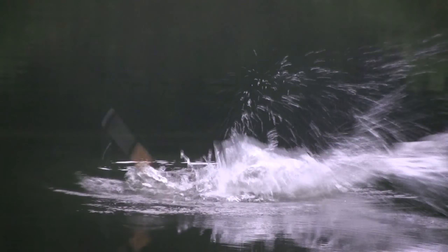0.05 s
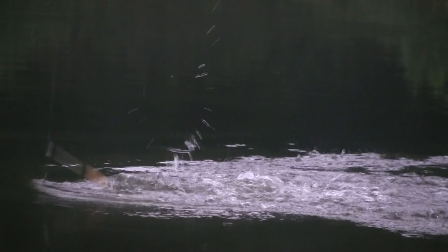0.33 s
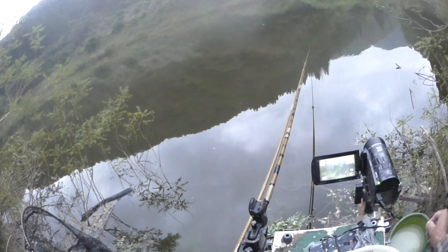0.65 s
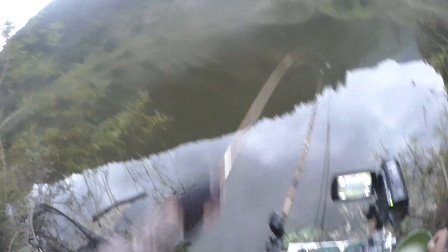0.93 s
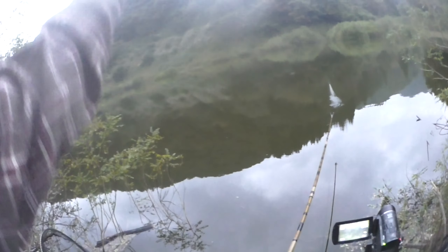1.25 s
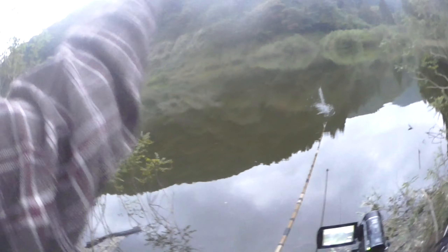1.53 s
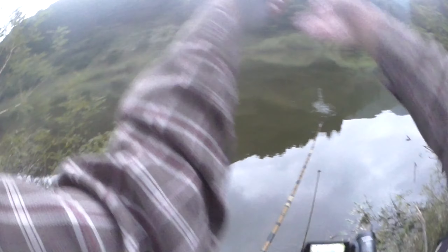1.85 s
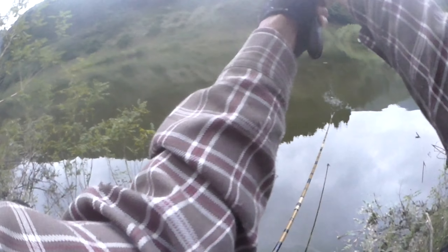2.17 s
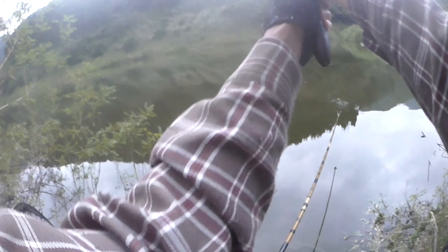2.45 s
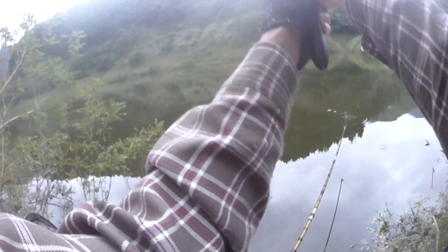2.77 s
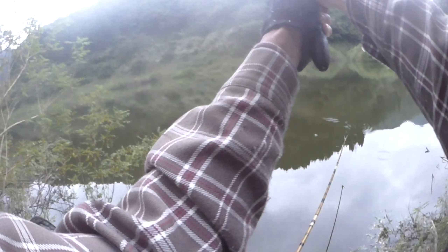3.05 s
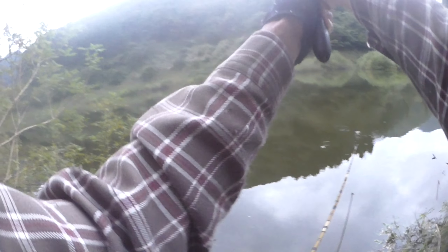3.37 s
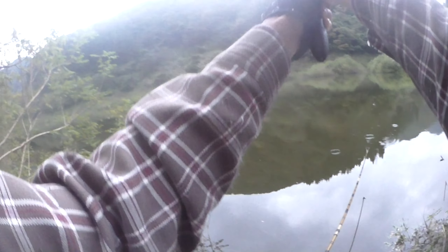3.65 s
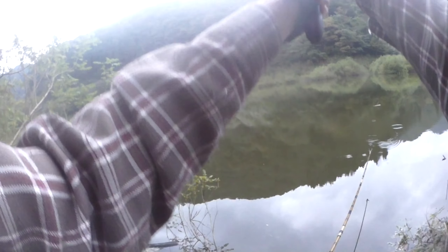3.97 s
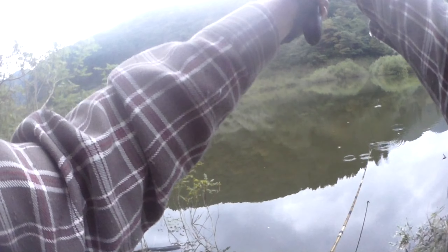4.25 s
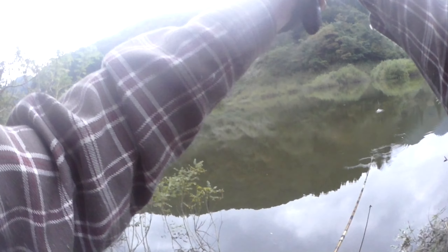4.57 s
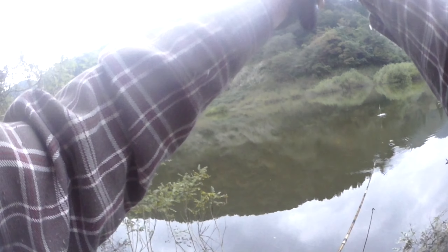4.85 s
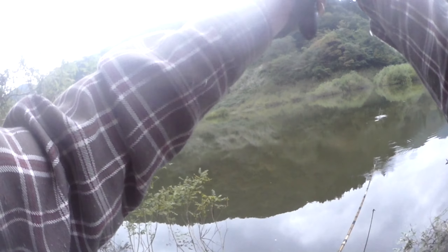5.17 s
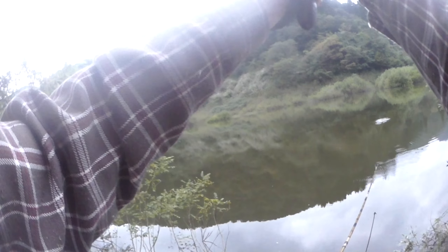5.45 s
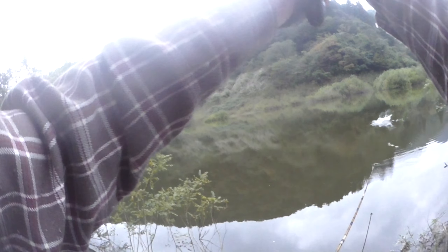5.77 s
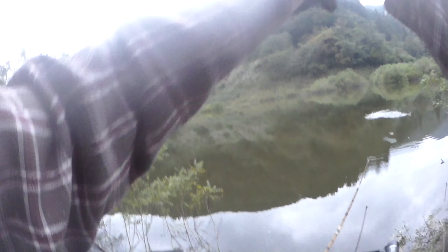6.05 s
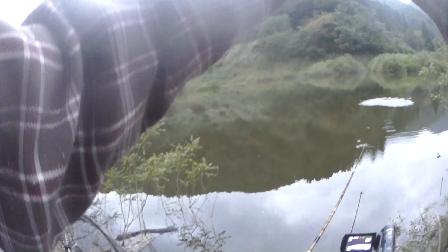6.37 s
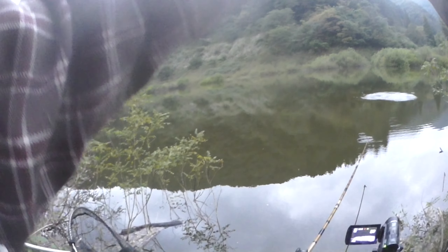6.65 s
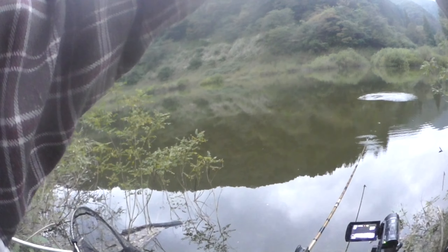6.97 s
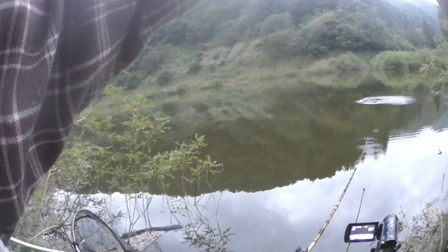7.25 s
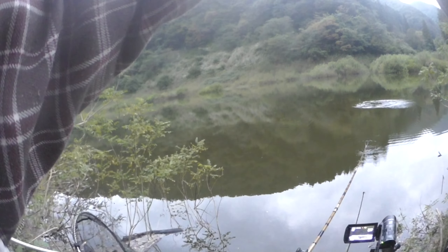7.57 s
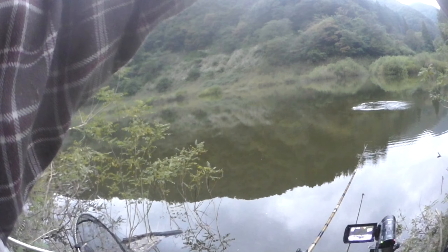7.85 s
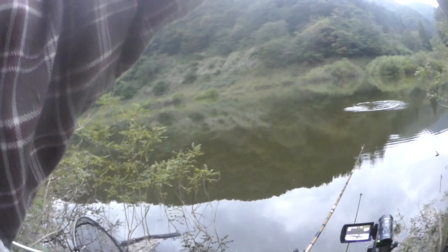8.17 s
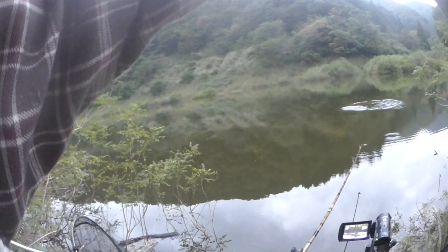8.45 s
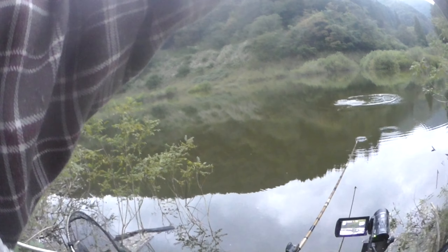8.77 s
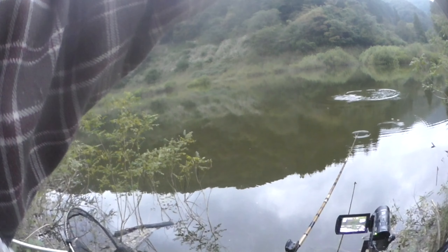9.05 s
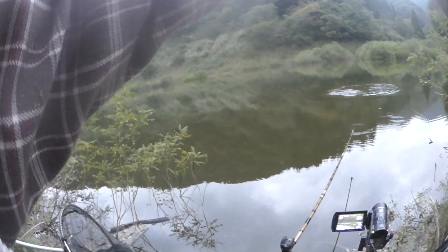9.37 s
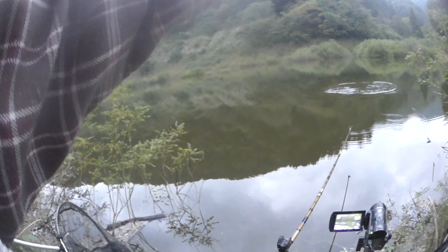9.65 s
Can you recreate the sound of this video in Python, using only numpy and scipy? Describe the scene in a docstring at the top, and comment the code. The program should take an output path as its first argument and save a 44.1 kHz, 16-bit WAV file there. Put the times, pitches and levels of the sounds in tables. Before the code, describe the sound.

Water splashes and spray patters down, followed by cloth scuffs and hollow knocks heard from inside a waterproof camera housing.

```python
"""Bait splash and a handled camera case

A bait ball splashes into a lake in the open air: bubbles resonate and spray rains back. From 0.65 s the
bank is heard from inside the waterproof case of a worn camera. Sleeves rub the case by stick-slip
friction, its mount knocks and creaks as the arms lift, and dull splashes pass through the shell.
A small bird calls faintly over the hiss of the microphone."""
import sys
import numpy as np
from scipy import signal
from scipy.fft import rfft, irfft
from scipy.io import wavfile
from scipy.ndimage import uniform_filter1d

SR = 44100
rng = np.random.default_rng(int(sys.argv[2]) if len(sys.argv) > 2 else 0)


def wrap_up_sound(samples):
    """Save the sound to the file named by the first command line argument, as 16-bit audio."""
    columns = np.atleast_2d(samples).T
    # keep every value between -1 and 1, then stretch to whole-number steps
    tamed = np.clip(columns, -1, 1)
    steps = np.round(tamed * 32767).astype(np.int16)
    wavfile.write(sys.argv[1], SR, steps)


N = 428211
TIME = np.arange(N) / SR
BINS_HZ = np.fft.rfftfreq(4096, 1 / SR)
USUAL_KNOCK_DB = -41

# knocks of the mount: start_s, level_db, thud_db, edge_db (the last two tilt the bass and the treble)
KNOCKS = [(0.7864, -51, -8, -13), (0.8668, -28.5, -7, -8.5), (1.0436, -20.5, -16, -24.5),
          (1.2219, -27.5, -20.5, -25), (1.2301, -30.5, -10.5, -32), (1.2452, -29.5, 2, -19),
          (1.2502, -25, -3, -9.5), (1.26, -32, -1, -20), (1.3534, -39.5, -3.5, -11.5),
          (1.6745, -38, 0.5, -16), (1.741, -23, -6.5, -14.5), (1.8471, -32.5, -10, -35),
          (1.9057, -36, 8, -13.5), (1.93, -36, -5.5, -21), (2.1254, -39, -11, -25), (2.242, -42, 4.5, -19),
          (1.967, -31, -12, -30), (2.0804, -39, -20.5, -19.5), (2.3495, -33.5, 1.5, -17),
          (2.459, -21.5, -17.5, -26), (2.4797, -36.5, -11.5, -26.5), (2.6292, -46.5, 5.5, -10),
          (2.67, -50, 1.5, -7), (2.7497, -45.5, 4.5, -16), (2.761, -41.5, -6.5, -18),
          (2.8115, -32.5, -5.5, -21), (2.995, -31.5, 0.5, -54), (3.0834, -51.5, -1, -18.5),
          (3.2206, -43.5, 7.5, -23), (3.4463, -41.5, -9, -42.5), (3.5341, -42, -6.5, -17),
          (3.5905, -43, -5.5, -19), (3.73, -44.5, -9.5, -27), (4.1883, -45.5, -4, -11.5),
          (4.266, -42, -8.5, -21), (4.281, -49.5, -11.5, -12.5), (4.3733, -48.5, 2, -8.5),
          (4.407, -39, -16.5, -30), (4.4407, -46, -1.5, -9.5), (4.5307, -43.5, -4, -10.5),
          (4.6224, -45.5, -4.5, -9), (4.6728, -45, -15, -19), (4.7141, -44.5, -6, -22.5),
          (4.729, -47, -2.5, -9), (4.7593, -53.5, -7.5, -13), (4.7923, -54.5, 13, -12.5),
          (4.8041, -46.5, -8.5, -14.5), (4.8822, -48.5, -9, -16.5), (4.977, -45, -10, -11.5),
          (5.0382, -51, -3, -5), (5.0761, -46, -0.5, -10), (5.0837, -40.5, -9, -29.5),
          (5.1726, -51.5, -8.5, -13), (5.2886, -46.5, -6.5, -13.5), (5.3046, -37, -3.5, -10),
          (5.41, -36, -6, -17), (5.414, -44.5, -4.5, -20), (5.4768, -38, -11, -16), (5.4867, -39, -7, -18),
          (5.5099, -44.5, 11, -11.5), (5.5713, -35, -9, -24), (5.6294, -33, 0, -33),
          (5.6439, -35.5, -8, -17.5), (5.6573, -41, -18, -24), (5.8968, -34.5, 10.5, -19.5),
          (6.1452, -16.5, -8, -23), (6.1731, -39.5, 0.5, -17.5), (6.464, -37, 3, -18.5),
          (6.5658, -24, 5.5, -29.5), (6.7604, -37.5, -10.5, -20), (6.8339, -42, 6.5, -9),
          (6.872, -40.5, -27, -18), (7.089, -39, -19, -29), (7.1754, -39.5, -27.5, -22.5),
          (7.346, -44, -10.5, -17.5), (7.3827, -47, -17.5, -16), (7.422, -42.5, -18, -2),
          (7.5219, -38.5, -20.5, -29), (7.581, -45.5, -21.5, -26), (7.696, -43, -20.5, -19),
          (7.7374, -47.5, -39, -11), (7.8239, -43.5, -20.5, -20), (7.8334, -37.5, -6, -11),
          (8.2777, -37.5, -0.5, -10.5), (8.7337, -43, -5.5, -14), (8.8698, -22.5, -6.5, -34.5),
          (8.9447, -48, -5.5, -18.5), (9.051, -45, 5, -10), (9.0809, -35, 1, -14.5),
          (9.1509, -49.5, -3, -8.5), (9.2297, -42.5, -4, -23), (9.3626, -48.5, -9.5, -20),
          (9.4547, -41, 6.5, -5.5), (9.4806, -50, -14, -18.5)]
# strokes of a sleeve over the case: start_s, length_s, ring_db, flex_db, rustle_db
STROKES = [(0.821, 0.15243, -41, -46, -52.5), (0.945, 0.1305, -34.5, -42, -51.5),
           (1.071, 0.1286, -31.5, -42, -46), (1.196, 0.06279, -27.5, -36.5, -57.5),
           (1.271, 0.0806, -44, -51.5, -62), (1.478, 0.525, -40.5, -52.5, -60.5),
           (1.803, 0.20056, -38, -44, -58.5), (2.026, 0.16697, -45, -49.5, -64),
           (2.232, 0.048, -43.5, -47.5, -63), (3.138, 0.07915, -59.5, -59.5, -87.5),
           (3.229, 0.18838, -45.5, -55, -70), (3.434, 0.4707, -55.5, -60.5, -70.5),
           (3.906, 0.22502, -50, -56.5, -66.5), (5.274, 0.035, -60.5, -59.5, -64),
           (5.376, 0.1226, -53, -58, -66.5), (5.637, 0.0659, -44.5, -46, -61.5),
           (5.697, 0.11789, -37.5, -42.5, -50), (5.834, 0.23044, -43, -43.5, -51.5),
           (6.035, 0.15374, -33, -40, -51.5), (6.204, 0.09843, -32.5, -46, -54),
           (6.305, 0.47479, -37, -49, -56.5), (6.777, 0.14175, -47, -57.5, -66.5),
           (7.005, 0.13403, -52, -58.5, -65.5), (7.288, 0.0903, -46, -63.5, -71),
           (7.764, 0.2205, -60, -70, -60.5), (8.052, 0.0966, -51, -59.5, -68),
           (8.462, 0.15823, -57, -69, -66.5), (8.635, 0.07743, -52, -63, -65.5),
           (9.024, 0.1023, -55, -65, -72), (9.273, 0.02559, -45.5, -54, -75.5),
           (9.45, 0.05442, -55, -61.5, -71.5)]
# course of the background: time_s, hiss_db, fizz_db, lapping_db
BACKGROUND = [(.65, -79.5, -73, -69), (1.3, -86, -70.5, -57.5), (1.5, -91.5, -76, -65),
              (2.6, -92, -81, -69), (5.1, -89.5, -80, -72.5), (5.45, -78, -72.5, -63),
              (7.0, -79.5, -72.5, -65.5), (9.71, -81.5, -73, -65.5)]
# spectrum of the hiss: frequency_hz, gain_db
HISS_SPECTRUM = [(4000, -27.5), (5700, -19.5), (6400, -5), (7100, -2), (7900, -5), (9400, -0.5),
                 (11000, -5.5), (13000, -5), (16000, -7.5)]
# spectrum of the fizz at the top of the hiss: frequency_hz, gain_db
FIZZ_SPECTRUM = [(9000, -37.5), (12600, -21), (13800, -5), (15500, -2)]


def open_splash():
    """Air entrainment: the cavity churns with large bubbles, and falling spray makes small ones."""
    # course of the splash: time_s, churn_db, spray_db
    envelope = [(0.0, -37.5, -47), (0.056, -46.5, -50.5), (0.066, -37, -43.5), (0.122, -49, -51.5),
                (0.21, -41.5, -42.5), (0.292, -53, -45), (0.416, -55, -50), (0.514, -62, -61),
                (0.65, -63.5, -60.5)]
    # spectrum of the churning cavity: frequency_hz, gain_db
    churn_spectrum = [(59, -105), (100, -62), (225, -12.5), (376, -4), (529, -0.5), (584, -2), (822, 0.5),
                      (1260, -3), (1450, -0.5), (3000, -24), (3900, -54), (6600, -120)]
    # spectrum of the spray: frequency_hz, gain_db
    spray_spectrum = [(710, -35), (1200, -1.5), (1790, 2), (1930, -4.5), (4000, -5.5), (9410, -22),
                      (11600, -22), (13500, -26), (16000, -49.5)]
    churn = bubble_cloud(223.26, 3051.5, per_s=1300, cycles=6.744, spread_db=0)
    churn += .5 * rng.standard_normal(N)
    spray = bubble_cloud(1903.1, 12806, per_s=3600, cycles=11.93, spread_db=5.0)
    spray += 0.829 * unit_rms(crackle(9000, spread_db=10.0))
    churn = amp(2.5) * colour(churn, churn_spectrum) * level(envelope)
    spray = amp(1.0) * colour(spray, spray_spectrum) * level(envelope, column=2)
    water = churn + spray + amp(-3.5) * drops()
    return signal.sosfilt(signal.butter(5, 200, "high", fs=SR, output="sos"), water)


def drops():
    """Impact and resonance: each big drop slaps the surface and traps a ringing bubble."""
    # single big drops: start_s, level_db, pitch_hz
    plops = [(0.019, -46.5, 782.4), (0.064, -40.5, 992), (0.143, -38, 1778), (0.188, -37.5, 698.1),
             (0.2, -26, 447), (0.245, -26.5, 1475), (0.401, -27, 1780), (0.46, -37.5, 899.8),
             (0.522, -37, 2362), (0.621, -39.5, 979.2)]
    out, lowpass = np.zeros(N), signal.butter(2, 6000, fs=SR, output="sos")
    for s, db, hz in plops:
        ring = bubble(hz, cycles=3.267, rise=0.045)
        slap = 0.3512 * rng.standard_normal(len(ring)) * np.exp(-TIME[:len(ring)] / 0.004907)
        plop = ring + signal.sosfilt(lowpass, slap)
        add(out, s, amp(db) * plop / abs(plop).max())
    return out


def glugs():
    """Bubble resonance: big bubbles wobble and climb in pitch on their way to the surface."""
    # large bubbles: start_s, peak_db, start_pitch_hz
    rising_bubbles = [(.012, -33.5, 815.3), (0.123, -51, 220), (0.135, -36, 1645), (.19, -45.5, 355.8),
                      (0.489, -59, 2450), (0.755, -55, 1516), (5.858, -41.5, 1651), (8.02, -54.5, 1834),
                      (8.1, -36, 578.2), (8.165, -42.5, 659.9)]
    out, t = np.zeros(N), TIME[:int(.035 * SR)]
    envelope = np.sin(np.pi * np.sqrt(t / t[-1])) ** 2
    for s, db, hz in rising_bubbles:
        wobble = uniform_filter1d(np.cumsum(rng.standard_normal(len(t))), size=18) * 0.00304
        turns = np.cumsum(hz * (1 + 9 * t)) / SR + wobble
        add(out, s, amp(db) * np.sin(2 * np.pi * turns) * envelope)
    return out


def bubble(hz, cycles, rise):
    """Damped oscillation: trapped air rings, fading by 1/e in `cycles` and rising near the surface."""
    age = np.arange(int(4 * cycles * SR / hz)) * hz / SR / cycles
    return np.sin(2 * np.pi * cycles * age * (1 + rise * age)) * np.exp(-age) * (1 - np.exp(-10 * age))


def bubble_cloud(low_hz, high_hz, per_s, cycles, spread_db, sizes=28):
    """Superposition: bubbles of many sizes ring at random times."""
    cloud = np.zeros(N)
    for hz in np.geomspace(low_hz, high_hz, sizes) * rng.uniform(.95, 1.05, sizes):
        births = crackle(per_s / sizes, spread_db)
        cloud += hz * signal.oaconvolve(births, bubble(hz, cycles, rise=.03))[:N]
    return unit_rms(cloud)


def mount():
    """Impulse excitation: the mount sticks and lets go, and each gritty push rings the case's modes."""
    # tone of the knock as heard, a dull body with a faint, thin top: frequency_hz, gain_db
    tone = [(40, -19), (120, 0.5), (250, 2.0), (420, 4), (1000, 3.5), (1500, -1.0), (3000, -11.5),
            (3900, -14), (4600, -33.5), (6000, -36.5), (7000, -27.0), (15000, -18.5)]
    out, t = np.zeros(N), TIME[:700] - .007
    for s, db, thud_db, edge_db in contacts():
        hard_db = max(db - USUAL_KNOCK_DB, 0)  # a hard knock has less top and less deep bass
        tilt = [(100, .5 * thud_db - 1.5 - 0.08 * hard_db), (250, thud_db + 0.5 - 0.033 * hard_db),
                (450, thud_db + 1), (650, thud_db + 2), (950, 0), (1200, 0),
                (2000, edge_db + 26), (3400, edge_db + 19.5), (4600, -.6 * hard_db)]
        # light touches are many tiny slips; a tightly held joint slips more cleanly
        tight = np.clip(thud_db / 5, 0, 1)
        grit = 0.05307 * amp(-.25 * (db + 36.0)) * (1 - 0.2933 * tight)
        slip = grit * rng.standard_normal(len(t)) * np.exp(-abs(t) / 0.0016505)
        slip[np.argmin(abs(t))] += 1
        chatter = np.clip(0.4134 * amp(-.5 * (db + 41.5)), 0, .5) * (1 - tight)
        slip[rng.integers(0, len(t), size=2)] += chatter * rng.standard_normal(2)
        ring = minimum_phase(case_response(loose=0.12) + spectrum_db(tone) + spectrum_db(tilt))
        joint_damping = np.exp(-250 * tight * TIME[:len(ring)])
        knock = signal.fftconvolve(slip, ring * joint_damping)
        knock *= np.sqrt(0.007901 * SR / np.sum(knock ** 2))  # the energy of about 8 ms at rms 1
        add(out, s + t[0] - .0005, amp(db) * knock)
    return out


def contacts():
    """Stick-slip in the mount: knocks, creaks of seven even slips and chance touches, as knock rows."""
    # creaks of the joint: start_s, gap_s, level_db
    creaks = [(2.3618, .0089, -43.5), (2.4981, .0059, -40.5)]
    slips = [(s + k * gap_s, db, 5, -20) for s, gap_s, db in creaks for k in range(7)]
    touches_per_s, touch_db = 9, -54.5
    touched, scatter_db = rng.random(N) < touches_per_s / SR, rng.standard_normal(N)
    touches = [(s, touch_db + db, -7, -9) for s, db in zip(TIME[touched], scatter_db[touched])]
    return list(KNOCKS) + slips + touches


def case_response(loose):
    """Modal summation, in dB: each contact point shifts and weights the modes of the case differently."""
    # modes of the case: frequency_hz, width_hz, gain_db
    modes = [(403.35, 253.16, -9.5), (713.53, 223.54, -7.5), (1024.7, 106.74, -2.5),
             (1397.6, 317.84, -16.5), (1839.3, 350, -25.5), (2649, 2300, -34.5)]
    hz, width, db = np.transpose(modes)
    shift, weight = rng.standard_normal((2, len(modes)))
    hz = hz + loose * width * shift
    gain = amp(db + 1.7 * weight) * (-1) ** np.arange(len(modes))
    f = BINS_HZ[:, None]
    resonances = gain * 1j * width * f / (hz ** 2 - f ** 2 + 1j * width * f)
    return 20 * np.log10(abs(resonances.sum(1)) + 1e-6)


def wall_delay(x):
    """All-pass dispersion: the wall takes up a push over a cycle or two, so the ring builds gradually."""
    radius, angle = np.exp(-np.pi * 420 / SR), 2 * np.pi * 1000 / SR
    denominator = [1, -2 * radius * np.cos(angle), radius ** 2]
    return signal.lfilter(denominator[::-1], denominator, x)


def sleeves():
    """Stick-slip friction: threads catch and slip in clumps, ringing the case and flexing its wall."""
    # spectrum of the rubbed case: frequency_hz, gain_db
    ring_spectrum = [(350, -39), (600, -6.5), (755, -4.5), (798, -20), (885, -7.5), (1050, 1), (1140, -1.5),
                     (1230, -8), (1450, -7.5), (1710, -22), (2330, -27.5), (3100, -32), (4000, -54),
                     (5200, -77), (8800, -120)]
    # spectrum of the flexing wall: frequency_hz, gain_db
    flex_spectrum = [(15, -70), (25, -45.5), (86, -37.5), (157, -28.5), (186, -22), (402, -8), (448, -10),
                     (507, -4), (818, -2.5), (898, -24), (1000, -9.5), (1300, -22.5), (2200, -120)]
    slips = unit_rms(crackle(1500, spread_db=4.0)) + 0.32653 * rng.standard_normal(N)
    slips *= amp(2.0005 * wander(top_hz=90))
    ring = amp(-2.0) * colour(slips, ring_spectrum)
    flex = amp(2.0) * colour(np.roll(slips, 60), flex_spectrum)
    ring *= rubbing(column=2, scuff_db=-57.5, rest_db=-68)
    flex *= rubbing(column=3, scuff_db=-64, rest_db=-71)
    return wall_delay(ring + flex)


def rubbing(column, scuff_db, rest_db):
    """Frictional drive, as a gain: strokes, a scuff that grows with each knock, and creep at rest."""
    strokes = [(row[0], row[1], row[column]) for row in STROKES]
    scuffs = [(s - .001, .014, scuff_db + 0.52 * (db - USUAL_KNOCK_DB)) for s, db, _, _ in KNOCKS]
    return np.hypot(gestures(strokes + scuffs), amp(rest_db))


def sleeve_zip():
    """Periodic excitation: ribs of the weave pass faster, then slower, in a fuzzy arching whistle."""
    # a sleeve sliding past as the arm swings up: time_s, level_db, pitch_hz
    glide = [(1.07, -63, 1710), (1.12, -46.5, 2200), (1.14, -49.5, 3084), (1.19, -59, 3516),
             (1.26, -68.5, 3419), (1.34, -64, 3240), (1.39, -64, 2000), (1.44, -67, 1493)]
    s, _, hz = np.transpose(glide)
    turns = np.cumsum(np.interp(TIME, s, hz)) / SR
    fuzz = wander(top_hz=330) + 1j * wander(top_hz=330)
    return (fuzz * np.exp(2j * np.pi * turns)).real * level(glide) * (TIME > s[0]) * (TIME < s[-1])


def muffled_water():
    """Transmission loss: lapping, falling spray and sleeve rustle are dulled by the shell."""
    # spray falling back on the lake: start_s, length_s, level_db
    washes = [(5.87, 0.1383, -47.5), (7.82, 0.2332, -67), (8.03, 0.33938, -59)]
    # transmission of the shell: frequency_hz, gain_db
    shell = [(300, -24), (600, 6.5), (1200, 6.5), (1900, 3), (2500, -2.5), (3200, -7), (3800, -16.5),
             (4200, -28.5), (4600, -49.5)]
    wash = bubble_cloud(500, 3980, per_s=900, cycles=7.7, spread_db=-1.5)
    wash += 2.5665 * unit_rms(crackle(3000, spread_db=5.5))
    lapping, rustle = level(BACKGROUND, column=3), gestures(STROKES, column=4)
    outside = np.sqrt(lapping ** 2 + gestures(washes) ** 2 + rustle ** 2)
    return amp(3.0) * colour(wash, shell) * outside


def gulps():
    """Cavity collapse: water closes over in a dying cluster of like-sized bubbles, with spatter."""
    # splashes heard through the shell: start_s, level_db, pitch_hz, decay_s
    splashes = [(5.79, -44, 1849, 0.01645), (5.862, -52.5, 1710, .012), (8.062, -41, 1533, 0.00991),
                (8.097, -34, 758.5, 0.00864), (8.119, -30, 648.2, 0.003637), (8.149, -47, 763.2, 0.00499),
                (8.172, -28, 707, 0.003493), (8.211, -50.5, 684.4, 0.02815), (8.305, -33, 1904, 0.001774),
                (8.319, -54, 779, 0.0303)]
    # transmission of the shell: frequency_hz, gain_db
    shell = [(100, -33), (400, 1), (600, 0.0), (2200, 3.0), (3500, -12.5), (4100, -40.5), (4600, -56.5)]
    out, t = np.zeros(N), TIME[:int(.15 * SR)]
    for s, db, hz, decay_s in splashes:
        ring = bubble(hz, cycles=1.843, rise=0.0265)
        cluster = unit_rms(signal.oaconvolve(rng.standard_normal(len(t)), ring)[:len(t)])
        spatter = rng.standard_normal(len(t))
        envelope = np.exp(-t / decay_s) * (1 - np.exp(-t / 0.000343))
        add(out, s, amp(db) * (cluster + spatter) * envelope)
    return signal.oaconvolve(out, minimum_phase(spectrum_db(shell)))[:N]


def sizzle(x):
    """Amplitude modulation: a faint high sizzle follows the envelope of every scuff and spatter."""
    band = signal.sosfilt(signal.butter(3, [1900, 4000], "band", fs=SR, output="sos"), x)
    strength = np.sqrt(abs(uniform_filter1d(band ** 2, size=300)))
    strength = strength / (1 + strength / amp(-46.0))  # saturates on hard knocks
    high = amp(-15.0) * colour(rng.standard_normal(N), HISS_SPECTRUM)
    fizz = amp(-21.5) * colour(rng.standard_normal(N), FIZZ_SPECTRUM)
    return strength * (high + fizz)


def bird(start_s, gap_s, notes):
    """Scattering: bushes blur an even run of thin falling whistles that starts softly."""
    out, t = np.zeros(N), TIME[:int(.06 * SR)]
    for k in range(notes):
        hz = np.linspace(3700, 3080, len(t)) * rng.uniform(.99, 1.01)
        note = np.sin(2 * np.pi * np.cumsum(hz) / SR) * np.hanning(len(t))
        scatter = rng.standard_normal(len(t)) * np.exp(-t / 0.0103)
        blurred = unit_rms(signal.fftconvolve(note, scatter)[:len(t)])
        add(out, start_s + k * gap_s, amp(-76.5 - 4 / 2 ** k) * blurred)
    return out


def hiss(buzz_hz):
    """Self-noise: the fine high hiss of the microphone pulses with a faint electrical buzz."""
    buzz = 1 + 3.6 * np.exp(-(((TIME * buzz_hz) % 1 - .64) / 0.026) ** 2)
    noise = rng.standard_normal((2, N)) * buzz
    high = amp(-3.0) * colour(noise[0], HISS_SPECTRUM) * level(BACKGROUND)
    fizz = amp(6.0) * colour(noise[1], FIZZ_SPECTRUM) * level(BACKGROUND, column=2)
    return high + fizz


def ticks():
    """Transients: very short bursts of high noise are heard as thin, sharp ticks."""
    # ticks: start_s, peak_db
    bursts = [(1.8662, -44), (1.9525, -44), (2.0951, -48.5), (2.5156, -44.5), (4.4457, -50),
              (6.3899, -41.5), (6.4176, -30), (6.4986, -39.5), (6.8192, -36.5), (6.9855, -46),
              (7.3548, -33.5), (7.6286, -45)]
    # their spectrum: frequency_hz, gain_db
    treble = [(5000, -56.0), (8000, -34.5), (12500, -32.5), (14500, -18.0), (15800, -7), (16400, -36)]
    noise = colour(rng.standard_normal(N), treble)
    out, t = np.zeros(N), TIME[:1500]
    for s, db in bursts:
        tick = noise[round(s * SR):][:len(t)] * t ** 2 * np.exp(-t / 0.00038)
        add(out, s, amp(db) * tick / abs(tick).max())
    return out


def rumble():
    """Noise floor: a faint, steady, low rumble."""
    # its spectrum: frequency_hz, gain_db
    bass = [(20, 1), (60, -6), (150, -6), (400, -13.0), (1500, -53.5)]
    return amp(-83.5) * colour(rng.standard_normal(N), bass)


def gestures(rows, column=2):
    """Incoherent addition: events (start_s, length_s, levels) build, hold, die and sum in power."""
    attack_s, release_s, rise_db_per_s = 0.024936, 0.020602, 0.5
    power = np.zeros(N)
    for row in rows:
        start_s, length_s = row[:2]
        t = TIME[:int((length_s + 8 * release_s) * SR)]
        shape = np.minimum(t / attack_s, 1) * np.exp(-np.maximum(t - length_s, 0) / release_s)
        add(power, start_s, (shape * amp(row[column] + rise_db_per_s * t)) ** 2)
    return np.sqrt(power)


def crackle(per_s, spread_db):
    """Poisson process: sparse clicks of uneven size."""
    size = amp(spread_db * np.minimum(rng.exponential(1, N), 3.3))
    return size * rng.choice([-1, 1], N) * (rng.random(N) < per_s / SR)


def wander(top_hz):
    """Band-limited noise from 6 Hz to top_hz, at rms 1."""
    hz = np.fft.rfftfreq(N, 1 / SR)
    return unit_rms(irfft(rfft(rng.standard_normal(N)) * (hz < top_hz) * (hz > 6), N))


def colour(x, points):
    """Linear filtering: x passes through a spectrum and leaves at rms 1."""
    return unit_rms(signal.oaconvolve(x, minimum_phase(spectrum_db(points)))[:N])


def minimum_phase(db):
    """Minimum phase: the quickest impulse response with this gain on BINS_HZ."""
    log_gain = np.log(amp(np.r_[db, db[-2:0:-1]]))
    return np.fft.ifft(np.exp(np.conj(signal.hilbert(log_gain)))).real[:len(BINS_HZ)]


def spectrum_db(points):
    """Interpolation of a spectrum onto BINS_HZ along a log-frequency axis."""
    hz, db = np.transpose(points)
    return np.interp(np.log(BINS_HZ + 1), np.log(hz + 1), db)


def level(rows, column=1):
    """Interpolation of one dB column in time, as a gain for every sample."""
    rows = np.array(rows)
    return amp(np.interp(TIME, rows[:, 0], rows[:, column]))


def amp(db):
    """Decibels to amplitude ratio."""
    return 10 ** (np.asarray(db) / 20)


def unit_rms(x):
    """Normalisation to rms 1."""
    return x / np.sqrt(np.mean(x ** 2) + 1e-20)


def add(mix, start_s, sound):
    """Superposition of a sound on the mix."""
    part = mix[max(round(start_s * SR), 0):][:len(sound)]
    part += sound[:len(part)]


def scene():
    """Two listening points in turn: the open air, then the inside of the case."""
    inside = np.clip((TIME - .65) / .002, 0, 1)
    splash = open_splash()
    throughout = glugs() + rumble()
    background = bird(start_s=7.216, gap_s=0.091, notes=7) + hiss(buzz_hz=119.88) + ticks()
    case = sleeves() + sleeve_zip() + muffled_water() + gulps() + wall_delay(mount())
    return ((1 - inside) * splash + inside * (case + sizzle(case) + background) + throughout)[None]


def record(dry):
    """Band limiting: a steep low-pass at 16050 Hz."""
    lowpass = signal.firwin(511, 16050, window=("kaiser", 9), fs=SR)
    return signal.oaconvolve(dry, lowpass[None], "same")


dry = scene()
out = record(dry)
wrap_up_sound(out)
```